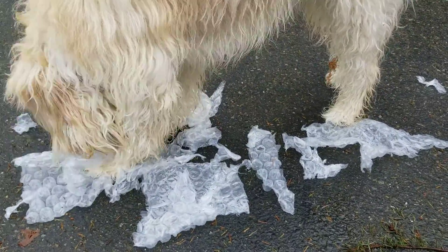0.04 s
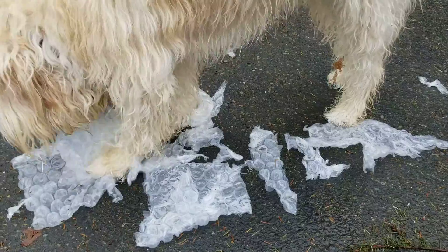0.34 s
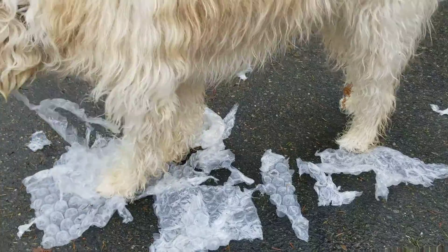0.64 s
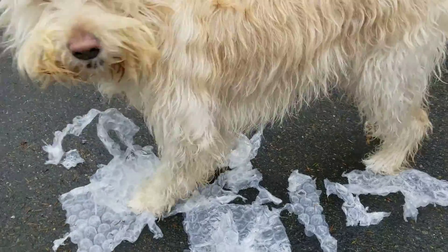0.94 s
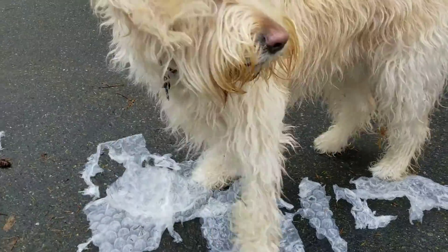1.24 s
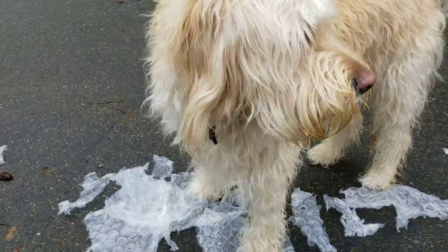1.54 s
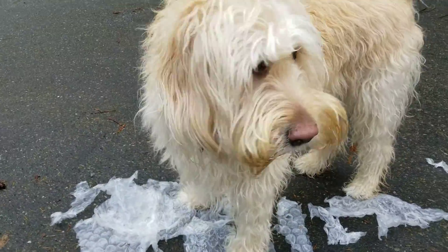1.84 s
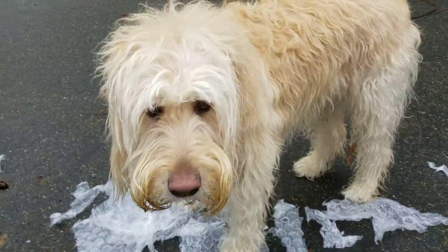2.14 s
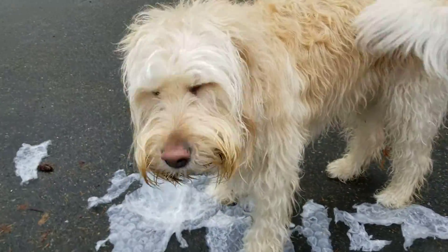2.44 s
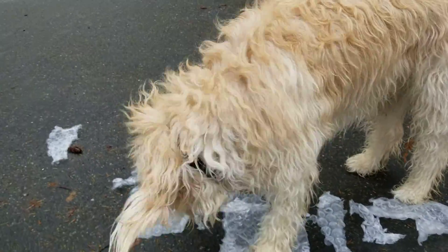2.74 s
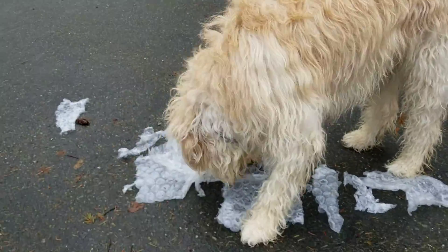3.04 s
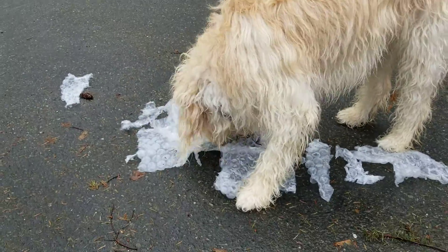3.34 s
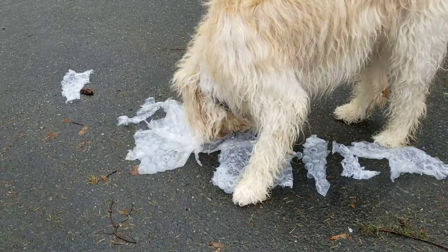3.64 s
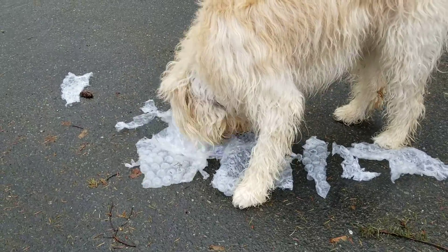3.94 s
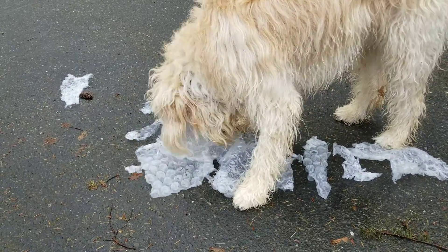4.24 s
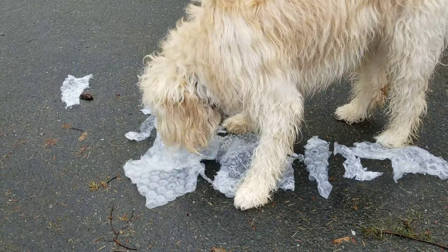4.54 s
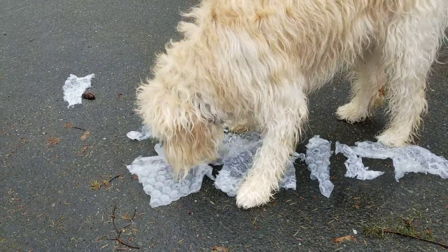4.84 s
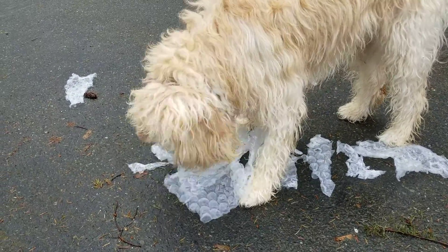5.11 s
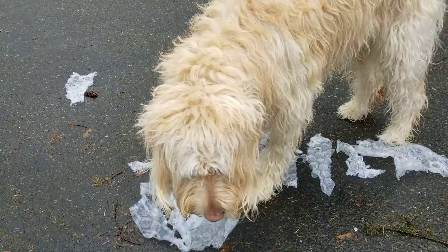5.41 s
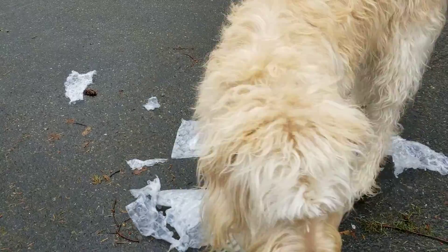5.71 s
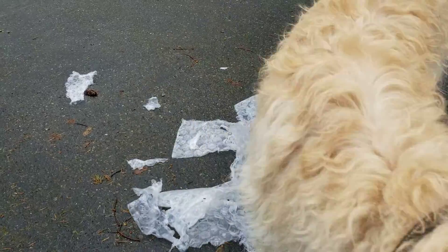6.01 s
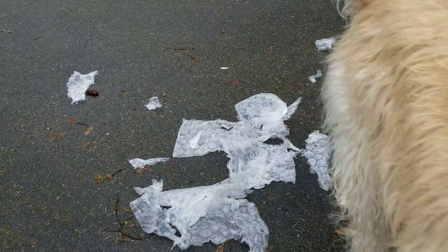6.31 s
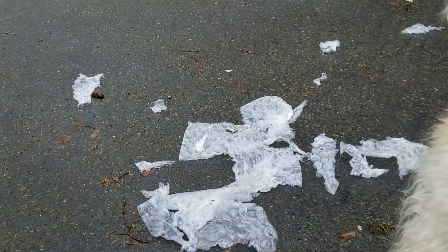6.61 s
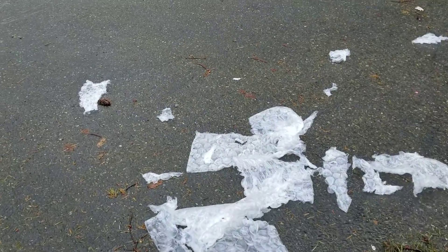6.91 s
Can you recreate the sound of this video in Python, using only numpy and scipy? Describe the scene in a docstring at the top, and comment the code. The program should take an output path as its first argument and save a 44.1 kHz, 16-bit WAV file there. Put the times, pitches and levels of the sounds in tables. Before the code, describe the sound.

Close by on an asphalt drive, a dog presses a sheet of bubble wrap, and a bubble bursts with a loud, sharp pop at 0.2 seconds. From 0.4 to 0.8 seconds the plastic snaps and crinkles with soft paw thumps. Dull, distant thuds land around 0.7 and 0.9 seconds, and fainter ones recur later. A second, brighter pop at 1.5 seconds echoes briefly off house walls. A lull follows, with a few soft low bumps on the microphone. From 3.5 seconds the dog noses the sheet, which lightly crinkles and rasps, and a third loud pop comes at 3.8 seconds. Soft rustling and scraping with small snaps continue until about 6 seconds, ending in a faint squeaky swish. A couple of ticks and a low bump near 6.9 seconds follow. Faint traffic rumble and open-air hiss run throughout, with occasional tiny bird chirps.

```python
"""Three bubbles of bubble wrap burst as a dog paws and noses the sheet on an asphalt drive.
Each releases one pressure pulse, which the house walls reflect. The film crinkles, snaps and rasps.
Soft low thumps come from pads on the wrap and from wind or handling on the phone.
Behind are far, dull thuds, a small bird, distant traffic and a hiss of open air.
The phone receives it all through two ports a hand's length apart; the right one is duller."""
import sys
import numpy as np
from scipy import signal
from scipy.fft import rfft, irfft, next_fast_len
from scipy.io import wavfile
from scipy.ndimage import map_coordinates

SR = 44100
rng = np.random.default_rng(int(sys.argv[2]) if len(sys.argv) > 2 else 0)


def persist_wave(psi):
    """Save psi, clipped to +-1, as 16-bit WAV."""
    counts = np.round(np.clip(psi, -1, 1) * 32767).astype(np.int16)
    wavfile.write(sys.argv[1], SR, np.atleast_2d(counts).T)


N = 311346
PORT_LAG_S = 0.0005  # travel time of sound from port to port

# Level curves of the background: time_s, level_db
TRAFFIC_LEVEL = [(0, -57.5), (.6, -41), (1.2, -53), (3.1, -56), (5.9, -53.5), (7.06, -46.5)]
AIR_LEVEL = [(0, -56), (1.3, -61), (2.6, -68.5), (4.3, -62), (6.1, -64.5), (6.6, -58), (7.06, -56.5)]
# Spectra of traffic, open air and a narrow high hiss: frequency_hz, level_db
RUMBLE_SPECTRUM = [(18, -36.5), (30, -8.5), (44, -8), (64, 1.5), (125, -7.5), (185, -16), (320, -28.5),
                   (600, -59.5)]
AIR_SPECTRUM = [(120, -23.5), (250, -11), (400, -12), (520, -16), (850, -15), (1400, -15.5), (1850, -9.5),
                (2500, -26.5), (3900, -19.5), (6500, -23), (9500, -31.5), (12000, -25), (14000, -29.5),
                (16000, -33.5)]
THIN_SPECTRUM = [(9500, -44.5), (11200, -12), (11800, 0), (12700, -3), (13400, -13), (16000, -20)]
# Reverberation time of the yard: frequency_hz, t60_s
YARD_DECAY = [(100, .5), (600, 0.53), (2200, 1.35), (5000, 1.6), (9000, 0.75), (16000, 0.25)]
# Bird notes: start_s, length_s, start_hz, end_hz, level_db
BIRD_NOTES = [(1.405, 0.034, 4500, 4150, -63), (2.766, .045, 5020, 5470, -54),
              (2.801, 0.015, 4740, 4520, -58.5), (6.091, 0.0197, 4300, 3800, -63.5),
              (6.484, 0.056, 3780, 4030, -65.5)]
# Far thuds: start_s, level_db, dullness_db, t60_s
FAR_THUDS = [(.704, -21.5, 5, .24), (.74, -29, 6.5, 0.46), (0.909, -26, 7.5, 0.35), (1.594, -43, 5, .28),
             (2.124, -47.5, 2.5, 0.299), (2.649, -58, -1, 0.52), (3.018, -56.5, 3.5, 0.25),
             (3.258, -41.5, 10.5, .32), (4.292, -48, 9, 0.22), (4.446, -38, 10, 0.32),
             (5.137, -38, 9, 0.12), (5.174, -42, 8, .22), (6.305, -39, 20, .32), (6.921, -59, -6, 0.036),
             (6.947, -51, 18.5, 1)]
# A thud's three scattered bands, direct strike and hollow knock: frequency_hz, level_db
BOOM_SPECTRUM = [(22, -45), (35, -17.5), (52, 1), (100, 1), (170, -5.5), (300, -16.5), (700, -56)]
BODY_SPECTRUM = [(90, -53.5), (200, -1.5), (380, -1), (700, -1), (1100, -10), (1800, -35), (4000, -71)]
CRACK_SPECTRUM = [(500, -28.5), (1300, -6.5), (2100, -2), (2700, -4), (3500, -11), (6500, -16.5),
                  (8500, -25.5), (16000, -52)]
STRIKE_SPECTRUM = [(300, -13.5), (900, 6), (1800, -14.5), (3000, 1), (4400, -17), (7000, -9), (12000, -35),
                   (16000, -58)]
KNOCK_SPECTRUM = [(200, -23.5), (480, -2.5), (720, 0.5), (1100, -13), (2500, -31.5), (8000, -59)]
# Pads on the wrap, then wind or handling mostly at the right port:
# start_s, level_db, pitch_hz, left_over_right_db
SOFT_THUMPS = [(0.4163, -22, 624, 0), (.4745, -24, 700, 0), (0.497, -19, 208, -0.5), (0.532, -26, 231, -1),
               (.586, -26.5, 303, 0), (.676, -29, 169, 0), (1.713, -38, 99.7, -5.5), (1.941, -38, 75, -12),
               (2.035, -37, 70.1, -11), (2.842, -39, 89, -13), (5.526, -42, 298, 0),
               (5.957, -36, 75.4, -1.5), (6.946, -27, 89, -20.5)]
# Scuffs of paw and muzzle: peak_s, width_s, level_db, centre_hz
SHEET_SCUFFS = [(.163, 0.019, -43, 601), (0.314, .016, -50.5, 4960), (.391, 0.0115, -41.5, 1090),
                (.59, 0.008, -42.5, 1320), (1.336, .008, -39.5, 2785), (2.372, 0.0085, -58.5, 3495),
                (2.422, 0.046, -64.5, 4120), (3.764, 0.019, -54, 893), (5.008, 0.039, -55.5, 2270),
                (5.769, 0.025, -53.5, 3870)]
# Narrow noisy bands of a squeaky swish: pitch_hz, level_db
SWISH_BANDS = [(1000, 0), (1370, 0), (2300, -3), (5250, -12)]
# Pushes on the sheet: start_s, length_s, crinkle_db, drag_db
SHEET_PUSHES = [(0.127, 0.036, -58.5, -50), (0.18, 0.073, -65, -62), (0.286, 0.13, -50.5, -52.5),
                (0.465, .05, -53.5, -52.5), (0.557, .185, -53.5, -46.5), (1.062, 0.039, -59, -88),
                (1.3, .045, -60.5, -56), (3.544, 0.16, -66.5, -61), (3.736, 0.048, -61.5, -56),
                (3.86, 0.21, -59.5, -56), (4.143, 0.14, -69, -79), (4.398, .2, -63, -60),
                (4.652, 0.16, -60.5, -57), (4.852, .21, -57.5, -54.5), (5.125, .11, -59.5, -54),
                (5.306, 0.31, -68, -62.5), (5.606, 0.17, -68.5, -55), (5.789, 0.12, -80, -62),
                (5.72, 0.029, -62, -70)]
# Spectra of the film creasing and scraping: frequency_hz, level_db
CREASE_SPECTRUM = [(400, -21.5), (900, 3), (2000, -2.5), (3500, -6.5), (6000, -7.5), (8000, -5.5),
                   (10000, -14.5), (12500, -4.5), (16000, -7.5)]
SCRAPE_SPECTRUM = [(150, -10), (400, -6.5), (650, -1), (1200, -9.5), (2200, -6), (3000, -5), (6500, -9),
                   (9000, -22.5), (14000, -39.5)]
# Snaps of the film: start_s, level_db, knock_db, leftward_db (halved in panning)
FILM_SNAPS = [(.1368, -33, -10.5, 11), (.415, -23, -5.5, 0), (0.474, -21.5, -4.5, 1),
              (0.4938, -22.5, -10, 2), (0.531, -29.5, -7.5, -3), (.5837, -36.5, 1, 5), (.63, -23, -9, 11),
              (0.6474, -25, -11, 9), (0.6957, -24, -10, 13), (0.7417, -26.5, 1, 13), (1.249, -45, -30, 5),
              (1.808, -41, -21, 0.5), (2.004, -46.5, -31.5, 2), (3.5519, -40.5, -17, 2),
              (4.6994, -39, -25, 14), (5.021, -34.5, -18, 12), (5.772, -35.5, -15, 8),
              (6.193, -44, -21.5, 2), (6.6148, -36.5, -35, 10)]
# Bursting bubbles: start_s, level_db, right_lag_ms, left_over_right_db, reverb_send_db
BUBBLE_POPS = [(.1881, -0.5, 0.16, 2, -46.5), (1.4907, -1, 0.049, 1, -34), (3.8441, -2.5, 0.079, 2, -39.5)]
# Burst spectra of a slack, a tight and a middling bubble: frequency_hz, level_db
SLACK_SPECTRUM = [(53, -49.5), (90, -19), (690, -1.5), (1210, -4), (1640, -16.5), (2090, -3.5),
                  (2380, -12.5), (3430, -38), (5780, -32.5), (6870, -44), (7490, -26), (8530, -52),
                  (12600, -35), (16000, -51.5)]
TIGHT_SPECTRUM = [(53, -39.5), (90, -16.5), (419, -16), (1070, -5.5), (1570, -5), (2130, -1.5), (2480, -6),
                  (3430, -11.5), (5530, -20.5), (6440, -21), (7660, -27), (12300, -37.5), (16000, -44)]
MIDDLING_SPECTRUM = [(53, -62), (90, -22.5), (998, 2), (1830, -3.5), (2130, -10), (2480, -4), (2830, -19.5),
                     (3290, -9), (4550, -15), (7330, -21), (8910, -31), (12100, -35.5), (16000, -55)]
# Wall reflections of the preceding pop: arrival_s, gain_db, left_over_right_db, t60_s
WALL_ECHOES = [(1.5027, -10, 9.5, 0.0096), (1.5285, -9.5, -1, 0.051), (1.544, -11.5, -2, 0.032),
               (1.552, -12.5, 5.5, 0.068), (1.594, -24.5, -0.5, 0.025), (3.853, -15.5, -7, 0.02),
               (3.8809, -10.5, -10.5, 0.04), (3.896, -16, 2, 0.098), (3.931, -23, -5, 0.06)]
# Responses of the ports: frequency_hz, gain_db
LEFT_RESPONSE = [(20, -14), (48, 3), (1500, 0.5), (6000, 4), (8500, 0), (12000, 3), (16000, 5)]
RIGHT_RESPONSE = [(20, -14), (48, 3.5), (1500, 0.5), (7000, 3.5), (8300, -15.5), (9500, -12.5), (12000, 2),
                  (15500, -11)]


def amp(db):
    """Amplitude ratio of a level in decibels."""
    return 10 ** (np.asarray(db) / 20)


def unit(x):
    """Normalisation to rms 1."""
    return x / np.sqrt(np.mean(x ** 2) + 1e-20)


def along(points, hz):
    """Interpolation on a logarithmic frequency axis."""
    knots_hz, values = np.transpose(points)
    return np.interp(np.log(hz + 1), np.log(knots_hz + 1), values)


def level(curve):
    """Amplitude envelope interpolated in decibels."""
    return amp(np.interp(np.arange(N) / SR, *np.transpose(curve)))


def pan(db):
    """Level difference, left over right, as two gains."""
    return amp([[db / 2], [-db / 2]])


def wobble(rate):
    """Smooth random modulation, rate knots a second."""
    return map_coordinates(rng.standard_normal(int(N * rate / SR) + 4), [np.arange(N) * rate / SR])


def filtered(x, response):
    """Linear filtering: the spectrum times a complex response."""
    n = x.shape[-1]
    size = next_fast_len(n + 4096)
    return irfft(rfft(x, size) * response(np.fft.rfftfreq(size, 1 / SR)), size)[..., :n]


def coloured(x, spectrum):
    """Zero-phase filtering by a tabulated spectrum."""
    return filtered(x, lambda hz: amp(along(spectrum, hz)))


def impulse(spectrum, size=2048):
    """Minimum phase gives the sharpest causal pulse with this spectrum; peak 1."""
    magnitude = amp(along(spectrum, np.fft.rfftfreq(size, 1 / SR)))
    cepstrum = irfft(np.log(magnitude + 1e-5))
    fold = np.r_[1, np.full(size // 2 - 1, 2), np.zeros(size // 2)]
    pulse = irfft(np.exp(rfft(cepstrum * fold)))
    return pulse / np.abs(pulse).max()


def ports(x, lag_s):
    """Path difference: direct sound reaches the right port lag_s later."""
    return np.array([x, filtered(x, lambda hz: np.exp(-2j * np.pi * hz * lag_s))])


def diffuse(size):
    """A diffuse field is coherent at the two ports only at low frequencies."""
    coherence = lambda hz: 0.93 * np.sinc(2 * hz * PORT_LAG_S)
    noise = rng.standard_normal((2, size))
    mid, side = filtered(noise, lambda hz: np.sqrt([1 + coherence(hz), 1 - coherence(hz)]))
    return unit(np.array([mid + side, mid - side]))


def add(out, start_s, sound):
    """Superposition of a sound from start_s on."""
    start = max(round(start_s * SR), 0)
    out[:, start:start + sound.shape[1]] += sound[:, :max(N - start, 0)]


def via(x, path):
    """Convolution of a mono source with a stereo impulse response."""
    return signal.fftconvolve(x[None], path, axes=1)[:, :N]


def yard(early_t60=0.34, late_db=-15, build_s=0.0061):
    """Reverberation: reflections from near walls die fast, those from far houses linger."""
    t = np.arange(SR) / SR
    hz, frame_s, spectra = signal.stft(diffuse(SR), SR, nperseg=256)
    decay = amp(-60 * frame_s / along(YARD_DECAY, hz)[:, None])
    late = signal.istft(spectra * decay, SR, nperseg=256)[1][:, :SR]
    early = diffuse(SR) * amp(-60 * t / early_t60)
    tail = (early + amp(late_db) * late) * (1 - np.exp(-t / build_s))
    return tail / np.linalg.norm(tail[0])


def scatter(t60):
    """Scattering: a rough surface returns a short spray of reflections; energy 1."""
    t = np.arange(SR // 10) / SR
    spray = diffuse(len(t)) * amp(-60 * t / t60)
    return spray / np.linalg.norm(spray, axis=1, keepdims=True)


def outdoors(hum_hz=353, hum_db=-70, thin_db=-18):
    """Ambient noise: diffuse traffic rumble and air hiss, a thin high hiss and a faint motor hum."""
    swell = amp(3.1 * wobble(10))
    rumble = swell * level(TRAFFIC_LEVEL) * unit(coloured(diffuse(N), RUMBLE_SPECTRUM))
    air = amp(0.51 * wobble(30)) * level(AIR_LEVEL) * unit(coloured(diffuse(N), AIR_SPECTRUM))
    thin = amp(thin_db) * level(AIR_LEVEL) * unit(coloured(rng.standard_normal(N), THIN_SPECTRUM))
    hum = amp(hum_db + wobble(6.7)) * np.sin(2 * np.pi * np.cumsum(hum_hz + 3 * wobble(8.8)) / SR)
    return pan(-2.3) * rumble + pan(-3) * air + pan(-14) * thin + hum


def bird(reverb_db=-2, waver_hz=150):
    """Frequency modulation: thin chips glide and waver, half lost in reverberation."""
    song = np.zeros((2, N))
    for start_s, length_s, start_hz, end_hz, db in BIRD_NOTES:
        progress = np.linspace(0, 1, int(length_s * SR))
        hz = start_hz + (end_hz - start_hz) * np.sin(np.pi * progress / 2)
        hz += waver_hz * wobble(400)[:len(hz)]
        note = np.sin(np.pi * progress) * np.sin(2 * np.pi * np.cumsum(hz) / SR)
        add(song, start_s, amp(db) * pan(4) * ports(note, PORT_LAG_S / 2))
    return song + amp(reverb_db) * via(song[0], yard())


def thuds(rise_s=0.0016, front_t60=0.016, linger_t60=1.6, direct_cap_db=-34):
    """Multipath propagation: a far blow arrives directly from the right and as a scattered wash."""
    out, t = np.zeros((2, N)), np.arange(SR) / SR
    arrivals = lambda: diffuse(N + SR) + amp(-6) * ports(rng.standard_normal(N + SR), -PORT_LAG_S)
    bands = np.array([unit(coloured(arrivals(), band))
                      for band in (BOOM_SPECTRUM, BODY_SPECTRUM, CRACK_SPECTRUM)])
    strike = ports(impulse(STRIKE_SPECTRUM), PORT_LAG_S)[::-1]
    knock = ports(impulse(KNOCK_SPECTRUM), PORT_LAG_S)[::-1]
    for start_s, db, dull_db, t60 in FAR_THUDS:
        boom, body, crack = bands[:, :, round(start_s * SR):][:, :, :SR]
        # A very dull thud swells in, with more boom and less crack.
        softness = np.exp((dull_db / 12.5) ** 2)
        onset = 1 - np.exp(-t / (rise_s * softness))
        fade = amp(-60 * t / t60)
        crack_fade = fade + amp(9 - 60 * t / front_t60) + amp(-26 - 60 * t / linger_t60)
        low = fade * (amp(-1.5 + 0.57 * dull_db) * boom + pan(1) * body)
        high = crack_fade * amp(-dull_db) * pan(1.4) * crack
        direct = (amp(20 - dull_db) * strike + amp(10) * knock) / np.sqrt(softness)
        add(out, start_s, amp(db) * onset * (low + high))
        add(out, start_s, amp(min(db, direct_cap_db)) * direct)
    return out


def thumps(rise_s=0.00053, t60_cycles=3.8):
    """Heavy damping: a soft thump, of a pad or of wind or handling on the phone, dies in a few cycles."""
    out, t = np.zeros((2, N)), np.arange(SR // 5) / SR
    for start_s, db, hz, side_db in SOFT_THUMPS:
        envelope = amp(db - 60 * t * hz / t60_cycles) * (1 - np.exp(-t / rise_s))
        thump = -1.5 * envelope * np.sin(2 * np.pi * hz * t)
        add(out, start_s, pan(side_db) * ports(thump, PORT_LAG_S / 2))
    return out


def grains(rate, spread_db, clump_db):
    """Shot noise: rate random clicks a second, unequal in size and swelling in clumps; rms 1."""
    occurs = rng.random(N) < rate / SR
    clicks = occurs * rng.standard_normal(N)
    size = np.minimum(rng.exponential(size=N), 4)
    return unit(clicks * amp(spread_db * size + clump_db * wobble(70)))


def scuffs(slope_db_per_octave=9):
    """Friction noise: each scuff is a brief swell of grains in a broad band."""
    out, t = np.zeros((1, N)), np.arange(SR // 4) / SR - 1 / 8
    grit = grains(rate=7400, spread_db=0, clump_db=2.5)
    for peak_s, width_s, db, centre_hz in SHEET_SCUFFS:
        band = lambda hz: amp(-slope_db_per_octave * np.hypot(1, np.log2((hz + 1) / centre_hz)))
        burst = unit(filtered(grit[round(peak_s * SR):][:len(t)], band))
        envelope = amp(db) * np.exp(-(t / width_s) ** 2)
        add(out, peak_s + t[0], (envelope * burst)[None])
    return out[0]


def swish(peak_s=5.895, width_s=0.068, glide_per_s=1.5):
    """Narrow-band noise: a brief squeaky swish whose bands glide down in pitch."""
    t = np.arange(N) / SR - peak_s
    pitch_ratio = np.exp(-glide_per_s * np.clip(t, -.5, .5))
    phase_per_hz = 2 * np.pi * np.cumsum(pitch_ratio) / SR
    bands = unit(sum(amp(db) * wobble(330) * np.sin(hz * phase_per_hz) for hz, db in SWISH_BANDS))
    return amp(-59.5) * bands * np.exp(-(t / width_s) ** 4)


def push(start_s, length_s, attack_share=0.25, grow_db=3.5, release_t60=0.39):
    """Loading and relaxation: a push takes hold, grows with the weight, and the sheet settles."""
    t = np.arange(N) / SR - start_s
    attack = np.clip(t / (attack_share * length_s), 0, 1)
    hold_db = grow_db * (np.clip(t / length_s, 0, 1) - .5)
    release_db = -60 * np.clip((t - length_s) / release_t60, 0, 2)
    return attack * amp(hold_db + release_db)


def sheet(muzzle_from_s=3, paw_lag_s=0.00023, muzzle_lag_s=0.00011, spill_db=-2, reverb_db=-15):
    """Buckling and friction: the sheet crackles as it bends and rasps as it slides over asphalt."""
    bending, sliding = sum(amp([[crinkle_db], [drag_db]]) * push(start_s, length_s)
                           for start_s, length_s, crinkle_db, drag_db in SHEET_PUSHES)
    bending *= amp(2.5 + 0.56 * wobble(7.3))
    crackle = lambda: grains(rate=2200, spread_db=1.5, clump_db=2.64)
    grit = lambda: grains(rate=7000, spread_db=1.5, clump_db=1.65)
    rasp = lambda: amp(-1) * sliding * unit(coloured(grit(), SCRAPE_SPECTRUM))
    clicks = crackle() + amp(-4) * grains(rate=170, spread_db=2.6, clump_db=1.8)
    creases = bending * unit(coloured(clicks, CREASE_SPECTRUM))
    skids = scuffs() + swish()
    rubbing = rasp() + skids
    # The paw works off to the left, the muzzle later and nearer the front.
    nosing = np.arange(N) / SR > muzzle_from_s
    placed_creases = ports(creases * ~nosing, paw_lag_s) + ports(creases * nosing, muzzle_lag_s)
    direct = pan(4) * placed_creases + ports(rubbing, muzzle_lag_s)
    # The rest of the wide sheet stirs too, differently at each port.
    spread = np.array([bending * unit(coloured(crackle(), CREASE_SPECTRUM)) + rasp() for _ in "LR"])
    spill = amp(spill_db) * pan(2) * (spread + via(skids, scatter(0.01)))
    return pan(1.4) * (direct + spill) + amp(reverb_db) * via(creases + rubbing, yard())


def snaps(shiver_db=8, shiver_t60=0.026):
    """Snap-through buckling: a crease flips with a bright tick and a short shiver of the sheet."""
    out = np.zeros((2, N))
    tick = impulse([(900, -32.5), (3000, -0.5), (6500, -2), (9000, -7), (15000, -6.5)])
    knock = impulse([(200, 3.5), (700, 22), (2200, 6), (5000, -26.5)])
    for start_s, db, knock_db, leftward_db in FILM_SNAPS:
        pulse = tick + amp(knock_db - 1) * knock
        gain = amp(db) * pan(leftward_db / 2)
        add(out, start_s + 0.00024, gain * ports(pulse, PORT_LAG_S))
        add(out, start_s, gain * amp(shiver_db) * via(pulse, scatter(shiver_t60)))
    return out


def pops(ground_db=-8, reverb_gain_db=29):
    """Sudden pressure release: a bubble emits one pulse; ground and legs scatter it, walls reflect it."""
    out = np.zeros((2, N))
    spectra = SLACK_SPECTRUM, TIGHT_SPECTRUM, MIDDLING_SPECTRUM
    for (start_s, db, lag_ms, side_db, send_db), spectrum in zip(BUBBLE_POPS, spectra):
        pulse = amp(db) * impulse(spectrum)
        add(out, start_s, pan(side_db) * ports(pulse, lag_ms / 1000))
        add(out, start_s + 0.0007, amp(ground_db) * via(pulse, scatter(0.016)))
        add(out, start_s + 0.0046, amp(send_db + reverb_gain_db) * via(pulse, yard()))
        for arrival_s, echo_db, echo_side_db, t60 in WALL_ECHOES:
            if start_s < arrival_s < start_s + .5:
                add(out, arrival_s, amp(echo_db) * pan(echo_side_db) * via(pulse, scatter(t60)))
    return out


def scene():
    """Superposition of all sources on and around the drive."""
    return pops() + thuds() + thumps() + snaps() + sheet() + bird() + outdoors()


def record(dry, cutoff_hz=15950):
    """Transduction: each port colours the sound, peaks saturate softly, and a low-pass limits the band."""
    heard = np.array([coloured(dry[0], LEFT_RESPONSE), coloured(dry[1], RIGHT_RESPONSE)])
    saturated = heard / (1 + heard ** 8) ** (1 / 8)
    return filtered(saturated, lambda hz: 1 / (1 + (hz / cutoff_hz) ** 120))


dry = scene()
out = record(dry)
persist_wave(out)
```